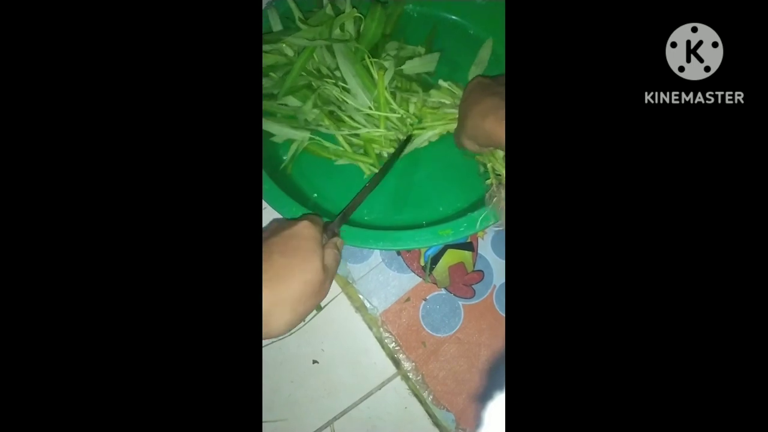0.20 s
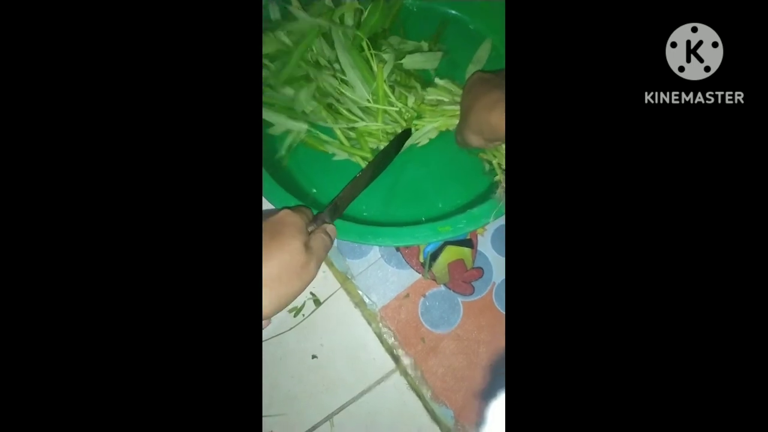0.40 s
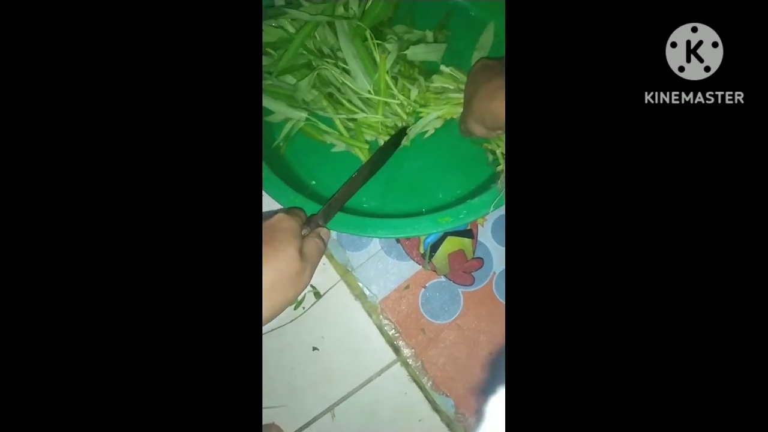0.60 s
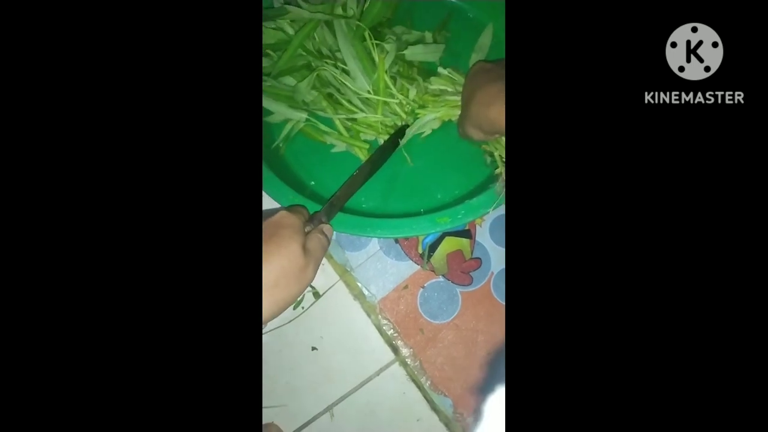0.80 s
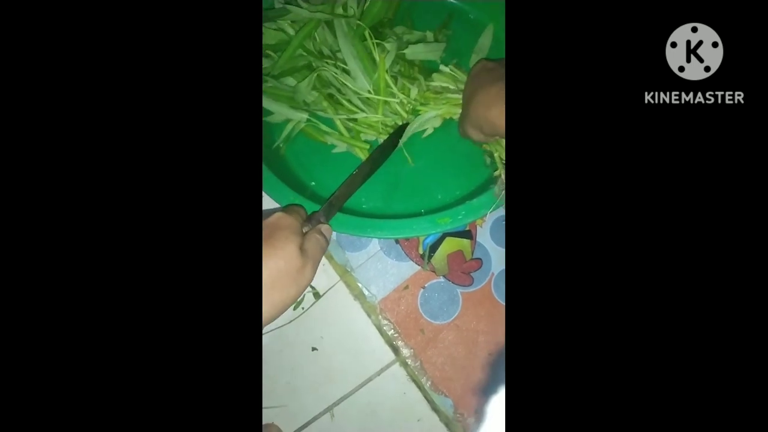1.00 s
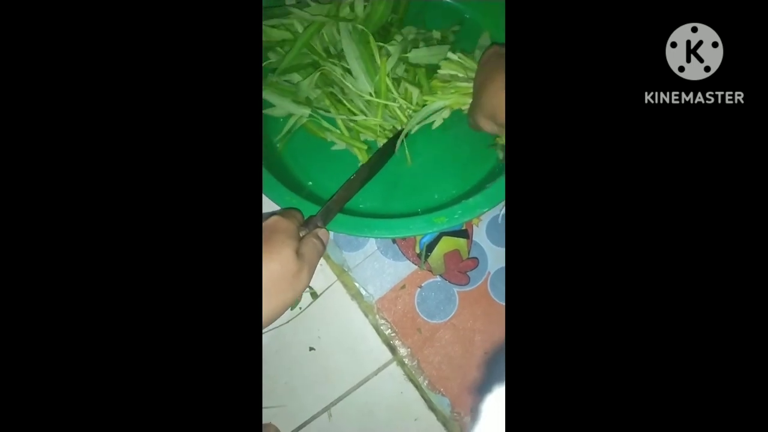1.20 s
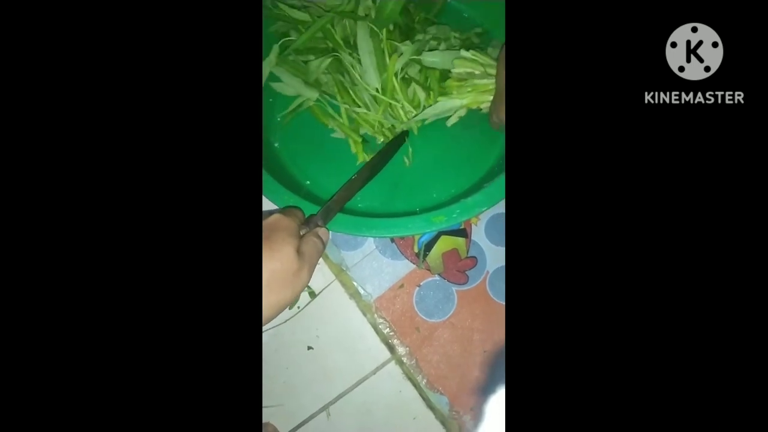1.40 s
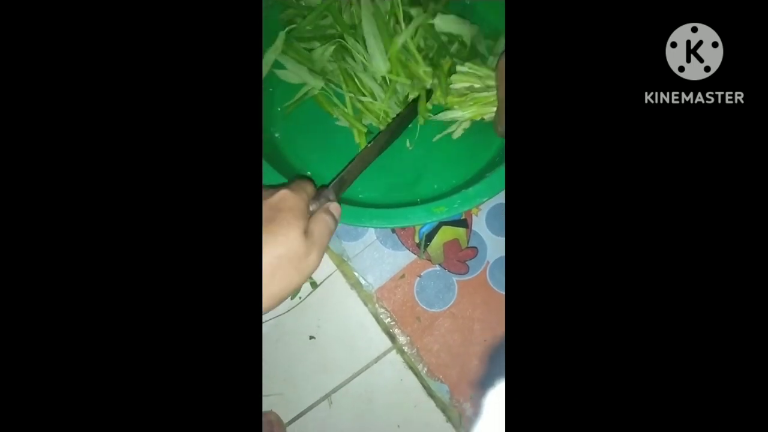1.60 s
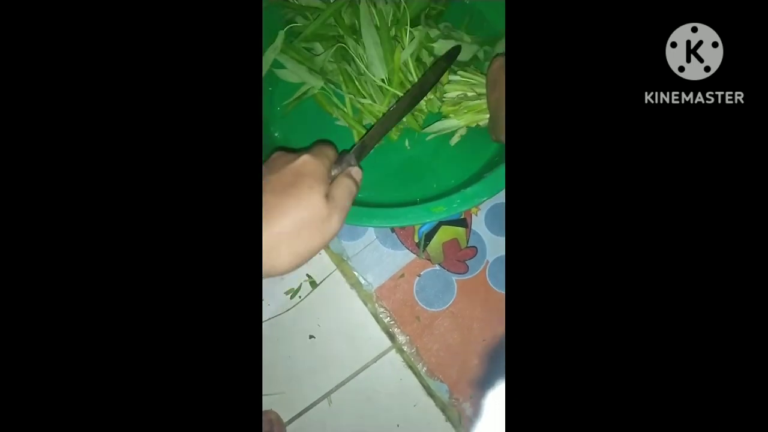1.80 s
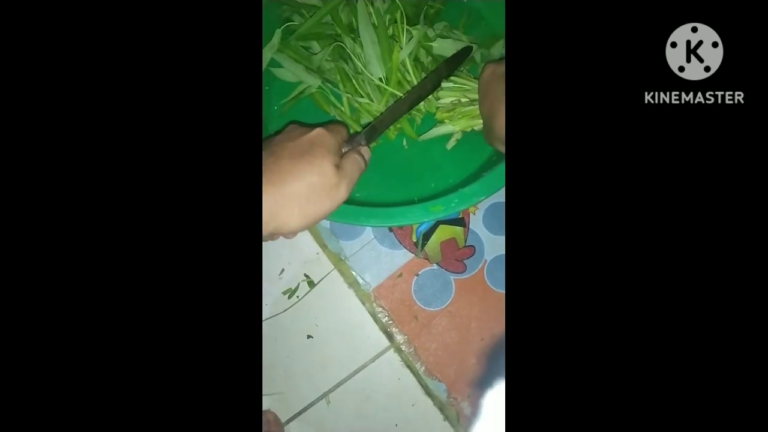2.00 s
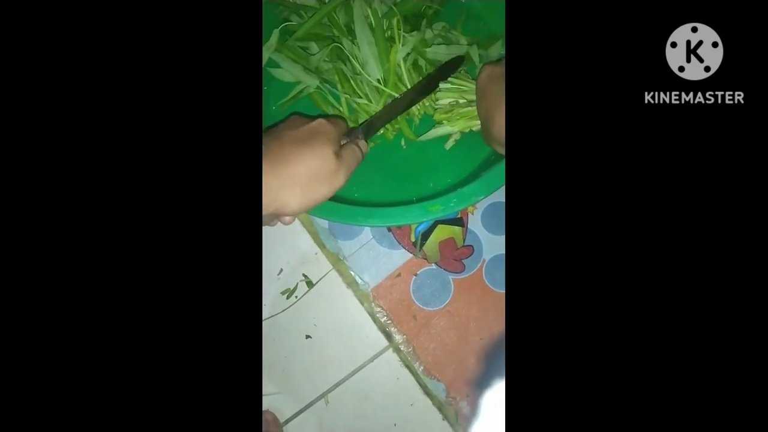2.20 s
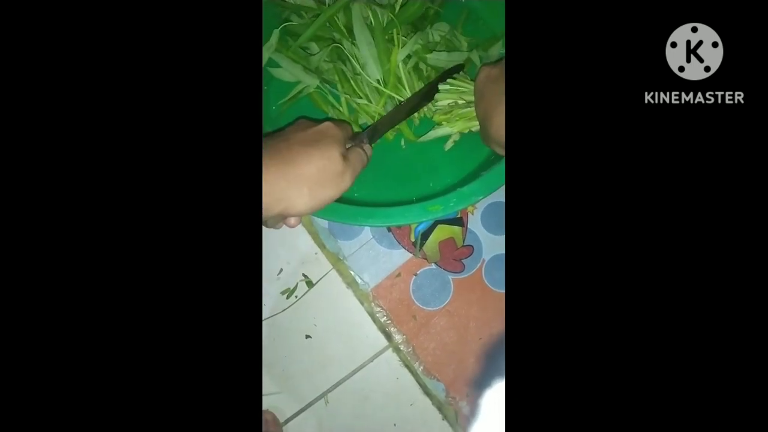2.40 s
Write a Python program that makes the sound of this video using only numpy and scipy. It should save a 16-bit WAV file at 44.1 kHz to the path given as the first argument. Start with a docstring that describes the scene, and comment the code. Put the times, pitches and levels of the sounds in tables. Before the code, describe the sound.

Crunchy stem cutting: one sharp snap early, a weaker one later, dull handling bumps between

```python
"""Knife on leafy stems

A kitchen knife cuts crisp leafy stems over a plastic bowl in a small tiled room: decaying modes for stem and bowl,
torn-fibre grains for the rubbing blade, noise tails for the room. Dull knocks ring the bowl's wall and rustle leaves.
Twice a few soft bumps jog the microphone's case. A fan hums faintly: wavering lines, rumble and air noise.
The left port faces the work, the right one is shaded."""
import sys
import numpy as np
from scipy import signal
from scipy.fft import rfft, irfft
from scipy.io import wavfile

SR = 44100
rng = np.random.default_rng(int(sys.argv[2]) if len(sys.argv) > 2 else 0)


def dump(signal):
    """Clip the signal to [-1, 1] and save it as 16-bit WAV at the path in sys.argv[1]."""
    limited = np.clip(np.atleast_2d(signal).T, -1, 1)
    pcm = np.round(limited * 32767).astype(np.int16)
    wavfile.write(sys.argv[1], SR, pcm)


N = 105840
T = np.arange(N) / SR


def from_db(db):
    """Decibels to gain."""
    return 10 ** (np.asarray(db) / 20)


def rms_one(x):
    """Scale to an rms of 1."""
    return x / np.sqrt(np.mean(x ** 2) + 1e-20)


def band(x, hz, kind, order):
    """Butterworth filter; edges are kept within 10 Hz and 0.45 SR."""
    edges_hz = np.clip(hz, 10, .45 * SR)
    sos = signal.butter(order, edges_hz, kind, fs=SR, output="sos")
    return signal.sosfilt(sos, x + 1e-18)  # inaudible offset


def fade(t60_s):
    """Exponential decay from time zero, 60 dB per t60."""
    return np.exp(-np.log(1000) * np.minimum(T / t60_s, 10))


def ring(hz, t60_s):
    """A struck mode: a decaying sine whose envelope starts at 1."""
    return np.sin(2 * np.pi * hz * T) * fade(t60_s)


def delayed(x, s):
    """The same sound, s seconds later."""
    lag = max(int(s * SR), 0)
    silence = np.zeros(x.shape[:-1] + (lag,))
    return np.concatenate([silence, x[..., :N - lag]], axis=-1)


def coloured(x, spectrum):
    """Give a white signal a spectrum, interpolated over log frequency; rms 1."""
    hz, db = np.transpose(spectrum)
    bins_hz = np.maximum(np.fft.rfftfreq(N, 1 / SR), 1)
    gain = from_db(np.interp(np.log(bins_hz), np.log(hz), db))
    return rms_one(irfft(rfft(x) * gain, N))


def drift(hz):
    """Random motion, mostly below hz, with an rms of 1."""
    rolloff = 1 + (np.fft.rfftfreq(N, 1 / SR) / hz) ** 2
    return rms_one(irfft(rfft(rng.standard_normal(N)) / rolloff, N))


def level_curve(points):
    """Gain over time from (time_s, level_db) points."""
    return from_db(np.interp(T, *np.transpose(points)))


def grain_sizes(spread_db, shape):
    """Grain heights with an exponential spread in dB, capped at three spreads."""
    return from_db(spread_db * np.minimum(rng.exponential(1, shape), 3))


def shaded(x):
    """At the far port the sound arrives later and weaker; lows bend round best."""
    shade_db, low_db, low_hz, lag_s = -21.5, -11, 700, 0.00029
    bent_lows = from_db(low_db) * band(x, low_hz, "low", order=2)
    return delayed(from_db(shade_db) * x + bent_lows, lag_s)


def in_room(near, far):
    """The direct sound at both ports, plus the short noise-like tail of the tiled room."""
    room_db, t60_s, build_s, right_db = -28, 0.11, 0.00036, -16
    envelope = fade(t60_s) * (1 - np.exp(-T / build_s))
    room = from_db(room_db) * rng.standard_normal((2, N)) * envelope
    wet = signal.fftconvolve(far[None], room, axes=1)[:, :N]
    return np.array([near + wet[0], shaded(near) + from_db(right_db) * wet[1]])


def fan():
    """Hum lines wavering in phase and level over a low rumble and faint air noise."""
    # fan lines: hz, left_rms_db, right_re_left_db
    hum = [(49.25, -53, 1), (96.85, -56.5, -3), (158, -62.5, -7.5), (381.6, -66.5, -19), (431, -63, -25),
           (489.7, -62, -25)]
    # low rumble spectrum: hz, relative_db_per_hz
    rumble_colour = [(20, -49), (32, -30), (44, 2), (54, 4.5), (68, -1.5), (90, -12.5), (125, -11.5),
                     (190, -19.5), (260, -26.5), (400, -26), (900, -47), (4000, -79)]
    # rumble swell: time_s, left_level_db
    rumble_level = [(0, -47.5), (.8, -48), (1.1, -51.5), (1.4, -50), (1.73, -49.5), (1.8, -48.5),
                    (2.05, -50.5), (2.4, -49)]
    # air noise spectrum: hz, relative_db_per_hz
    air_colour = [(25, -19), (55, 1.5), (120, -1.5), (220, -4), (330, -16), (450, -16.5), (620, -17.5),
                  (1200, -22), (3000, -27.5), (8000, -30.5), (14000, -30.5), (17000, -45)]
    air_db, rumble_right_db = -59.5, -3
    waver_db, wander_rad, waver_hz = 4, 0.59, 13.5

    out = from_db(air_db) * coloured(rng.standard_normal((2, N)), air_colour)
    rumble = level_curve(rumble_level) * coloured(rng.standard_normal(N), rumble_colour)
    out += rumble * from_db([[0], [rumble_right_db]])
    for hz, db, right_db in hum:
        phase = 2 * np.pi * hz * T + wander_rad * drift(waver_hz)
        line = np.sin(phase) * from_db(waver_db * drift(waver_hz))
        out += from_db(db) * rms_one(line) * from_db([[0], [right_db]])
    return out


def bumps():
    """A dry gritty contact excites the case's modes, with a low thud at the left port and a shell ring at the right."""
    # bumps on the case: start_s, thud_db, knock_db, right_ring_db, click_gain_db, click_hz,
    # ping_db, tick_gain_db, tick_hz
    bump_table = [(0.492, -23, -15.5, -28, -30.5, 1850, -57, -31, 10000),
                  (0.5148, -26.5, -21, -21, -29, 2040, -24.5, -37.5, 8000),
                  (0.5375, -29, -27, -53, -60, 3150, -42, -55, 8950),
                  (0.542, -28.5, -24.5, -26.5, -41, 2350, -40, -43.5, 9000),
                  (1.536, -27, -26.5, -42, -39, 2340, -56, -39.5, 11300),
                  (1.5499, -22.5, -25.5, -21, -30, 1820, -31, -39, 9800),
                  (1.6368, -35, -16.5, -30.5, -28.5, 1890, -39, -34, 12100),
                  (1.6456, -30.5, -23.5, -27, -29.5, 2120, -59, -53, 8000),
                  (1.6524, -59, -34, -29, -42, 2300, -59, -59, 9000),
                  (1.666, -29, -33, -46, -48.5, 2720, -58, -51, 9000),
                  (1.6731, -30.5, -25, -30.5, -49, 2280, -47, -46.5, 10100)]
    # case modes: hz, level_db, t60_s
    case_modes = [(178, -10, 0.027), (377, 0, 0.014), (712, -11.5, 0.014), (970, -14.5, 0.017)]
    click_span, click_t60_s = 1.47, 0.0085  # span: band edge over centre
    tick_span, tick_t60_s = 1.54, 0.0051
    soft_hz = 1320  # a soft contact leaves the case's treble unexcited
    knock_shade_db, contact_shade_db = -10, -21.5

    case = sum(from_db(db) * ring(hz, t60_s) for hz, db, t60_s in case_modes)
    thud = ring(75, t60_s=0.074)
    shell = ring(302, t60_s=0.026) + from_db(1.5) * ring(743, t60_s=0.0067)
    ping = ring(3430, t60_s=0.004)  # a hard edge of the case
    click_fade, tick_fade = fade(click_t60_s), fade(tick_t60_s)
    out = np.zeros((2, N))
    for s, thud_db, knock_db, ring_db, click_db, click_hz, ping_db, tick_db, tick_hz in bump_table:
        grit = rng.standard_normal(N)
        click_band_hz = [click_hz / click_span, click_hz * click_span]
        tick_band_hz = [tick_hz / tick_span, tick_hz * tick_span]
        contact = from_db(click_db) * band(3 * grit * click_fade, click_band_hz, "band", order=3)
        contact += from_db(tick_db) * band(2 * grit * tick_fade, tick_band_hz, "band", order=2)
        contact += from_db(ping_db) * ping
        knock = from_db(knock_db) * case
        left = knock - from_db(thud_db) * thud
        right = from_db(knock_shade_db) * knock - from_db(ring_db) * shell
        body = band(np.array([left, right]), soft_hz, "low", order=2)
        out += delayed(body + contact * from_db([[0], [contact_shade_db]]), s)
    return out


def wall_knocks():
    """Cushioned by leaves, a knock rings only the low modes of the bowl's wall; the leaves rustle as they settle."""
    # dull knocks on the soft wall: start_s, level_db, rustle_db, room_send_db
    knocks = [(0.6958, -32, -43.5, -3), (.778, -81, -49, 2.5), (0.794, -49, -51, -3), (.839, -54, -50, -1)]
    # wall modes: hz, level_db, t60_s
    wall_modes = [(313, 3.5, 0.026), (520, -17, 0.17), (744, 1.5, 0.061), (890, 4.5, 0.079),
                  (1050, -5, 0.049), (1285, 1, 0.046), (1324, -7.5, 0.052)]
    # pass band of the wall: low_hz, high_hz
    wall_band_hz = [247, 1430]
    # pass band of the leaves: low_hz, high_hz
    rustle_band_hz = [660, 1364]
    rustle_t60_s = 0.12

    modes = sum(from_db(db) * ring(hz, t60_s) for hz, db, t60_s in wall_modes)
    wall = band(modes, wall_band_hz, "band", order=5)
    near, far = np.zeros(N), np.zeros(N)
    for s, db, rustle_db, room_db in knocks:
        noise = band(rng.standard_normal(N), rustle_band_hz, "band", order=3)
        rustle = rms_one(noise) * fade(rustle_t60_s)
        knock = delayed(from_db(db) * wall + from_db(rustle_db) * rustle, s)
        near += knock
        far += from_db(room_db) * knock
    return in_room(near, far)


def rubbing():
    """Tiny fibres tear under the sliding blade: random grains mixed with smooth noise."""
    # blade against the bunch: time_s, left_level_db
    rub_level = [(0, -44), (.07, -64), (.15, -73), (.2, -44.5), (.29, -41.5), (.32, -53.5), (.38, -59),
                 (.47, -62.5), (.57, -51), (.66, -56), (.72, -71), (1.02, -70.5), (1.08, -60), (1.2, -60.5),
                 (1.33, -53), (1.4, -51.5), (1.5, -54.5), (1.72, -66.5), (1.85, -68), (1.92, -61.5),
                 (2.1, -74.5), (2.4, -73.5)]
    # rubbing spectrum: hz, relative_db_per_hz
    rub_colour = [(300, -7.5), (700, -11), (900, -4), (1150, -3), (1400, 2), (1600, 0.5), (1850, -8),
                  (2400, -14.5), (3000, -17.5), (4500, -21), (7000, -30.5), (16000, -33)]
    fibres_per_s, spread_db, right_db = 1400, 2.5, -21.5
    smooth = 0.99  # noise rms over grain rms

    torn = rng.random((2, N)) < fibres_per_s / SR
    sizes = grain_sizes(spread_db, (2, N)) * rng.choice([-1, 1], (2, N))
    grains = rms_one(torn * sizes) + smooth * rng.standard_normal((2, N))
    return coloured(grains, rub_colour) * level_curve(rub_level) * from_db([[0], [right_db]])


def snaps():
    """Each break rings stem and bowl, sheds splinters, bounces off near surfaces and dies away in the room."""
    # stems give way: start_s, level_db, pitch_hz, low_edge_hz, high_edge_hz, bright_crack_db,
    # room_send_db, favoured_bowl_tone_hz, tone_db
    snap_table = [(0.1723, -41.5, 1430, 500, 3100, -1, -2, 810, -10),
                  (0.1995, -31.5, 1500, 700, 2020, -22, -19, 940, -8),
                  (0.2165, -37.5, 1510, 600, 2400, 5, -23, 1060, -20),
                  (0.2207, -10, 1235, 825, 2980, -3.5, -6.5, 520, -25),
                  (0.223, -17, 1410, 860, 2320, -18.5, 4, 1030, -19),
                  (0.258, -35, 1380, 900, 1780, -15, 3, 1050, -10),
                  (0.28, -40, 1420, 800, 2200, 7, 2.5, 1067, 0),
                  (0.3248, -43, 890, 556, 1970, 5.5, 5.5, 766, -6.5),
                  (1.422, -21, 1170, 370, 2200, -14.5, 3, 727, -10)]
    # bowl modes rung by every snap: hz, level_db, t60_s
    bowl_modes = [(390, -14, 0.025), (438, -10.5, 0.036), (510.3, -28, 0.31), (891, -16, 0.08),
                  (1100, -49, 0.19), (1300, -33, 0.019), (1420, -1.5, 0.017), (1520, -18, 0.086),
                  (1915, -21.5, 0.064), (2045, -13.5, 0.019), (2190, -1.5, 0.0054), (4350, -12, 0.011)]
    # reflections from bowl and floor: delay_s, level_db
    echoes = [(.0012, 1), (.0032, -2), (.0075, -11)]
    # pass band of the splinters: low_hz, high_hz
    splinter_band_hz = [2780, 4200]
    stem_t60_s, crack_db = 0.0058, -7.5
    stem_low_share = 0.45  # a thin stem radiates little below this share of its pitch
    tone_t60_s = 0.087  # the place of the cut favours one tone of the bowl
    splinters_per_s, splinter_db, splinter_spread_db, splinter_t60_s = 900, 5.5, 5, 0.11

    bowl = sum(from_db(db) * ring(hz, t60_s) for hz, db, t60_s in bowl_modes)
    crack = from_db(crack_db) * (T == 0)  # one-sample impulse
    near, far = np.zeros(N), np.zeros(N)
    for s, db, hz, low_hz, edge_hz, bright_db, room_db, tone_hz, tone_db in snap_table:
        stem = band(ring(hz, stem_t60_s) + crack, stem_low_share * hz, "high", order=4)

        # fibres keep parting after the snap
        sizes = grain_sizes(splinter_spread_db, N) * (2 * rng.random(N) - 1)
        parting = rng.random(N) < splinters_per_s / SR
        splinters = band(parting * sizes * fade(splinter_t60_s), splinter_band_hz, "band", order=1)
        near += from_db(db + bright_db + splinter_db) * delayed(splinters, s)
        near += from_db(db + tone_db) * delayed(ring(tone_hz, tone_t60_s), s)

        parts = band(np.array([stem, bowl]), low_hz, "high", order=2)
        dull = band(parts, edge_hz, "low", order=7)
        bright = from_db(bright_db) * band(parts, edge_hz, "high", order=2)
        stem, rung = from_db(db) * delayed(dull + bright, s)
        near += stem + rung
        near += sum(from_db(echo_db) * delayed(stem, lag_s) for lag_s, echo_db in echoes)
        far += from_db(room_db) * (1.37 * stem + .5 * rung)
    return in_room(near, far)


def scene():
    """The fan's hum, bumps, knocks on the bowl and cutting."""
    return fan() + bumps() + wall_knocks() + rubbing() + snaps()


def record(dry):
    """The deepest bass is rolled off and the top is cut steeply."""
    low_cut_hz, cutoff_hz = 37, 15800
    dry = band(dry, low_cut_hz, "high", order=4)
    steep = signal.ellip(10, .1, 70, cutoff_hz, fs=SR, output="sos")  # 0.1 dB ripple, 70 dB stop band
    return signal.sosfilt(steep, dry)


dry = scene()
out = record(dry)
dump(out)
```